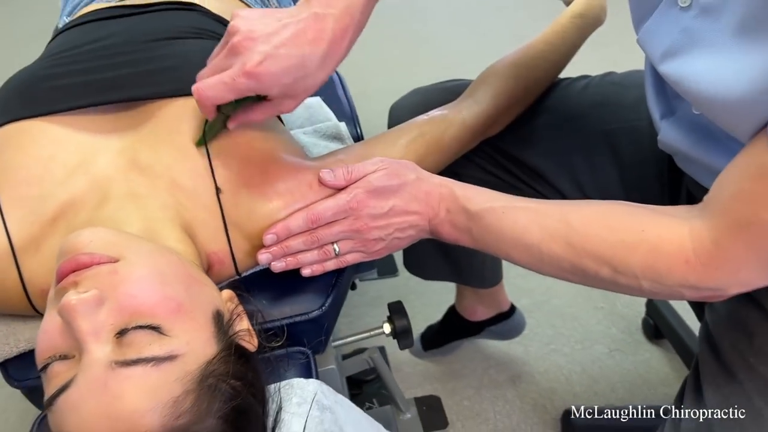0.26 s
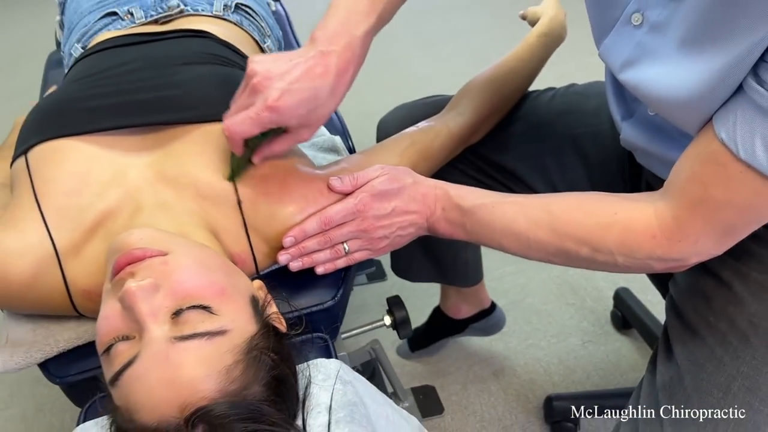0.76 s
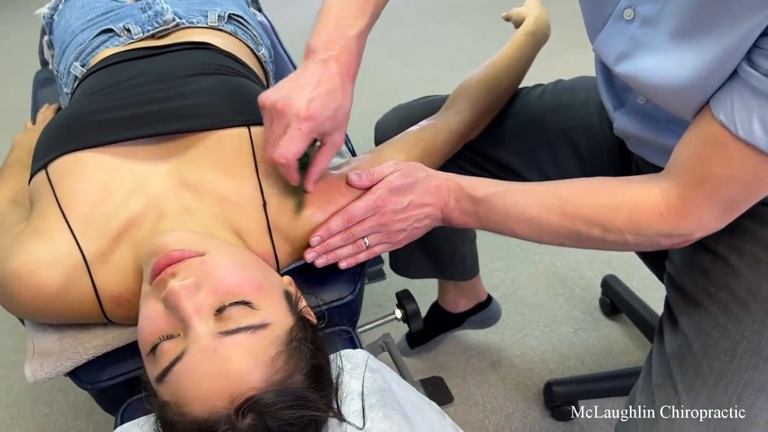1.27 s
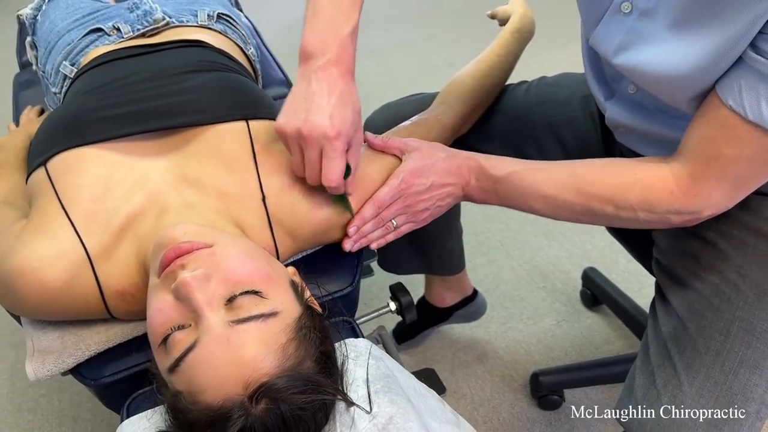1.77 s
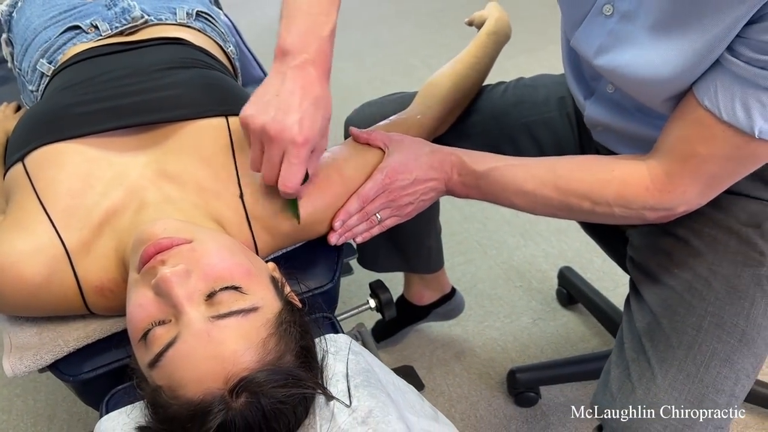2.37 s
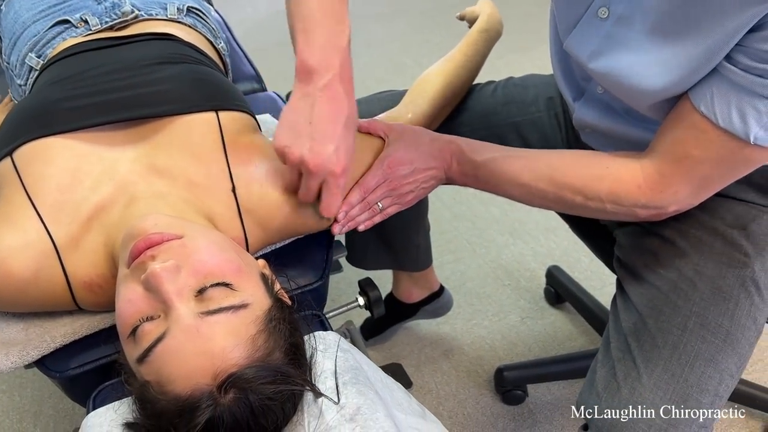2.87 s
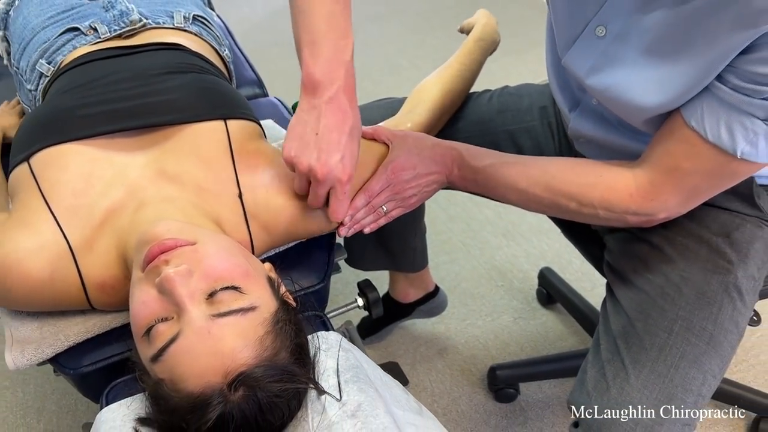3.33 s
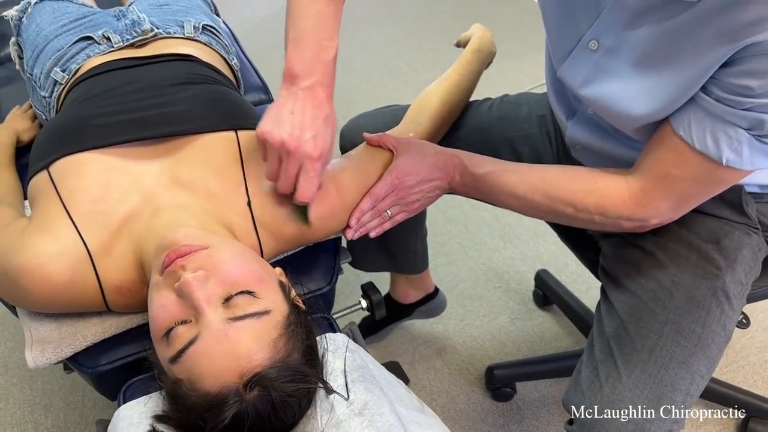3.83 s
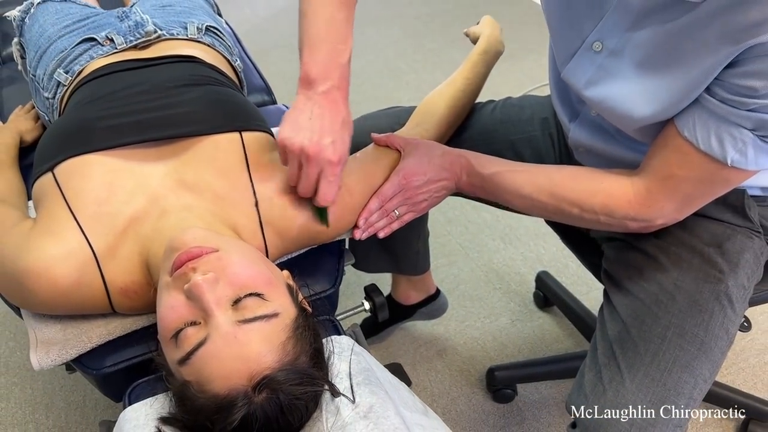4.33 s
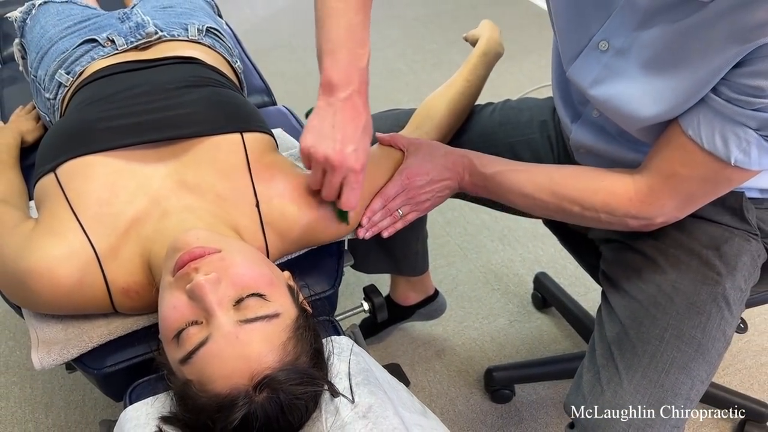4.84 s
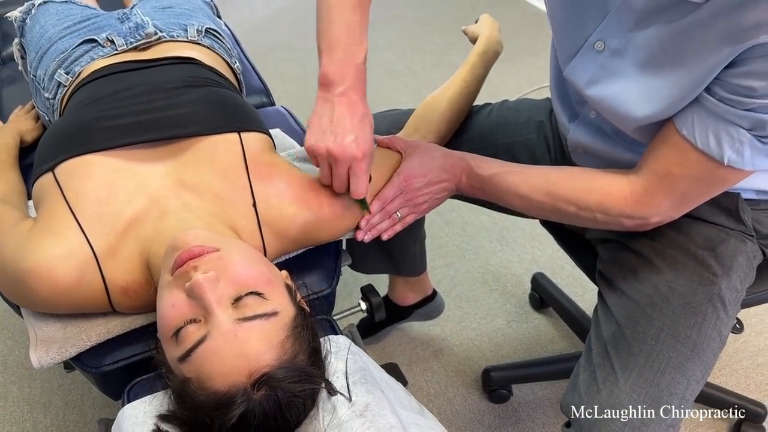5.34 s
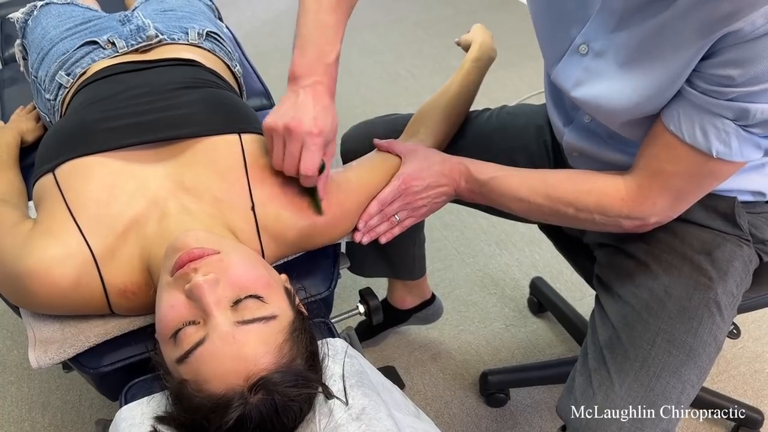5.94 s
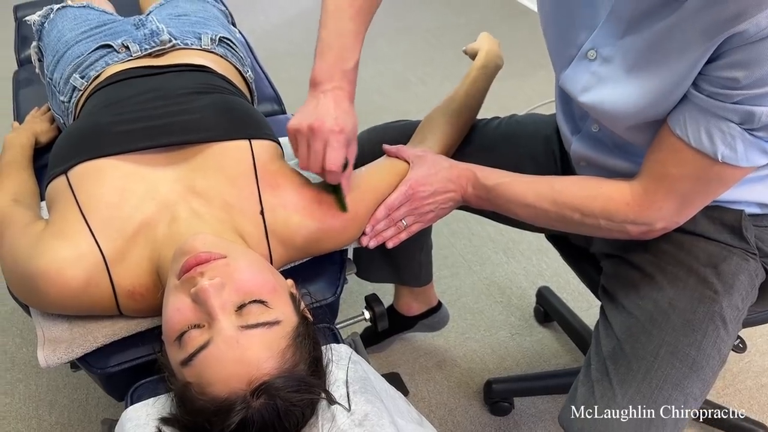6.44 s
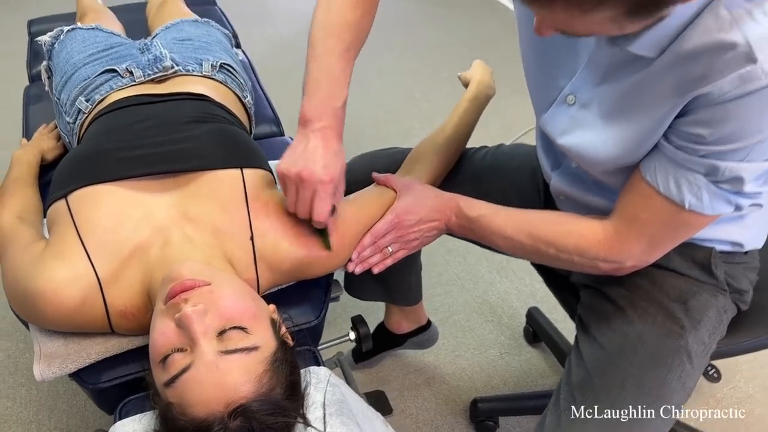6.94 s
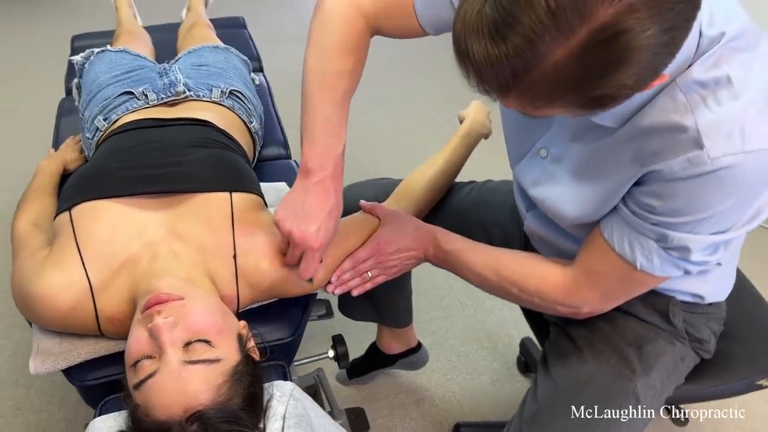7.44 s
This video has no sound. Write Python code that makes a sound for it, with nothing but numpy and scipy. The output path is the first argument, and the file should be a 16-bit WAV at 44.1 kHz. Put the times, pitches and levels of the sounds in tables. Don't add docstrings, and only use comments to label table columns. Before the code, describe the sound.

In a small treatment room with low ventilation rumble, one sharp loud snap comes early, then faint skin strokes, small ticks and a paper crumple.

```python
import sys
import numpy as np
from scipy import signal
from scipy.fft import rfft, irfft
from scipy.io import wavfile

SR = 44100
rng = np.random.default_rng(int(sys.argv[2]) if len(sys.argv) > 2 else 0)


def rack_gain(trim_db):
    fader = np.asarray(trim_db, float)
    return 10 ** (fader / 20)


def output_pcm(signal):
    pcm = np.clip(np.atleast_2d(signal).T, -1, 1) * 32767
    wavfile.write(sys.argv[1], SR, np.round(pcm).astype(np.int16))


N = 339570

# (start [s], tool on skin [dB], cloth and paper [dB])
STROKES = [(1.837, -66, -67), (2.057, -70, -71), (2.264, -70, -65), (3.023, -71, -65), (3.788, -71, -62.5),
           (4.19, -70, -66.5), (4.6, -70, -64), (5.04, -61, -64.5), (5.468, -68, -65), (5.91, -76, -70),
           (6.067, -65, -76), (6.293, -65, -69), (7.59, -68, -63.5)]
STROKE_RISE_S, STROKE_HOLD_S, STROKE_FALL_S = 0.021, 0.052, 0.026
# (start [s], length [s], skin [dB], cloth and paper [dB])
JERKS = [
    (0, 0.015, -48, -54),
    (0.212, 0.14, -61, -54),
    (0.41, 0.23, -60.5, -54.5),
    (0.456, 0.075, -57, -57),
    (.585, 0.23, -65, -61.5),
    (0.839, 0.22, -58.5, -56),
    (2.906, 0.082, -56.5, -70),
    (6.577, 0.04, -57, -55.5),
    (7.293, 0.038, -57, -60),
    (7.495, 0.041, -56.5, -61),
]
JERK_RISE_SHARE, JERK_HOLD_SHARE = 0.1, 0.081
# (start [s], hold [s], skin [dB], cloth and paper [dB])
SHIFTS = [
    (1.08, .75, -67, -73.5),
    (2.605, .26, -79, -69),
    (5.27, .23, -70, -71),
    (6.507, 0.04, -61, -60.5),
    (6.608, .18, -67, -61.5),
    (7.175, 0.053, -65, -56.5),
    (7.243, 0.033, -72, -55.5),
    (7.358, 0.092, -64, -58),
]
SHIFT_RISE_S, SHIFT_FALL_S = 0.046, 0.094
SKIN_FLUTTER_DB, CLOTH_FLUTTER_DB = 3, 1.8
# (frequency [Hz], density [dB per Hz])
SKIN = [(600, 4), (1000, 6), (1600, 8.5), (2500, 3.5), (4000, -11), (8000, -29)]
# (frequency [Hz], density [dB per Hz])
CLOTH = [(1500, -11), (2500, -2), (4500, 2), (7000, -3.5), (10500, -0.5), (13000, -10), (16000, -15)]

# (time [s], peak [dB])
SNAP = [
    (.32855, -6),
]
# (frequency [Hz], level [dB], t60 [s])
SNAP_MODES = [(800, -19.5, 0.018), (2040, -7, 0.0028), (3670, -2, 0.0022), (4960, -2.5, 0.0032),
              (7600, -1.5, 0.0006), (11100, -5.5, 0.0013)]
SNAP_TOP_HZ = 13500
# (from [s], to [s], low edge [Hz], high edge [Hz])
TREBLE_GAP = (.313, .3235, 2700, 12500)

# (time [s], peak [dB], ring [Hz], top end [dB], room [dB])
TICKS = [(0.1264, -51, 1530, 4, 4), (0.481, -46, 1870, 10, 0), (0.5916, -41, 1660, 4.5, -4.5),
         (0.7347, -53, 1410, -2, -2), (0.8948, -28.5, 1740, -7, -11.5), (0.935, -49.5, 2920, 7, -4),
         (1.3917, -46, 1440, -5, -16), (1.413, -37.5, 1530, -13, -14), (1.642, -40.5, 1480, -6, -13),
         (2.9102, -42, 1680, -6, -16), (5.2719, -38, 8500, -6, -11), (5.3545, -45.5, 1460, -4, -6),
         (6.6387, -51, 1630, 5, -12), (6.6738, -50, 1600, 4, -16), (6.791, -49.5, 1510, 8.5, -12),
         (7.461, -43, 13000, -14, -16)]
SHORTEST_RING_S = .0035
BOUNCE_S, BOUNCE_DB = 0.0052, -10

# (time [s], level [dB rms], hold [s], t60 [s])
CRUMPLE = [
    (3.457, -42, .022, .19),
]
# (frequency [Hz], density [dB per Hz])
PAPER = [(350, -22), (500, 1), (670, -11), (1050, 0.5), (1500, -12), (2260, -5.5), (3540, -12.5),
         (8000, -13), (12000, -21), (16000, -31.5)]

# (time [s], pitch [Hz], level [dB rms])
SQUEAK = [
    (2.62, 3020, -82),
    (2.64, 3040, -71),
    (2.7, 3050, -68),
    (2.75, 3075, -69),
    (2.79, 3040, -69),
    (2.82, 2950, -72),
    (2.86, 2930, -71),
    (2.875, 2930, -84),
]

# (frequency [Hz], t60 [s])
ROOM_DECAY = [(500, 0.43), (1500, 0.33), (4000, 0.33), (8000, 0.23), (14000, 0.21)]
# (frequency [Hz], width [Hz], left [dB per
# Hz], right [dB per Hz], right lead [rad])
ROOM_MODES = [(8, 4.7, -60, -53, -0.5), (28, 7.1, -53, -61.5, 1.5), (39.8, 4, -50, -62, 5),
              (55, 25, -59.5, -58.5, 0.5), (69.9, 2.4, -45.5, -53, -2.6), (87.2, 12.5, -59, -55.5, 0.37),
              (98.3, 16, -58.5, -57, 0.1), (112.35, 6.6, -47, -53.5, 1.5), (127.3, 5.1, -55, -53.5, 1.34),
              (142.7, 13, -69, -56, 1), (164, 22, -77, -67, 0.2), (179.4, 6.4, -64, -72.5, 0.2),
              (195.7, 10, -73, -59, -1.66),
              (224.4, 36, -69.5, -66, -1.06), (243, 18, -60.5, -70, 2.5), (265.8, 16, -66, -64, 0.04),
              (280.6, 18.9, -67.5, -61.5, 1.07), (301.3, 15.6, -67, -68, 0.03),
              (341.8, 39, -69, -65.5, 1.15), (368.7, 18.5, -80, -68.5, 0.9), (401, 6.1, -81.5, -71, -0.1),
              (415, 13.3, -72.5, -74, -0.5), (434.3, 4.3, -85, -75, -0.5), (473.4, 9.9, -77.5, -77, 0.4),
              (598.4, 36, -79.5, -77.5, 1.14), (756, 24, -82, -85, -0.6), (860, 38, -86, -84.5, 0.8)]
# (frequency [Hz], left [dB rms], right [dB rms], right lead [rad])
HUM = [(13.64, -49.4, -49.4, -.3), (19.8, -58, -50.5, .2), (27.27, -52.8, -42.7, .9),
       (29.1, -49, -46.5, 1.2), (58.96, -44.4, -49, 1.1), (117.53, -37.6, -44.2, -2.04),
       (120, -44.7, -54.2, -1.36), (176.23, -62.4, -62.5, -.95), (234.94, -54.8, -61.2, .52),
       (240, -56.3, -61.5, 1.05)]
# (frequency [Hz], density [dB per Hz])
AIR = [(210, -50), (350, -10), (431, -7), (540, -9), (613, -14.5), (680, -14.5), (870, -15), (1060, -20),
       (1500, -23.5), (2630, -27.5), (6000, -29.5), (12000, -30), (14500, -31), (16000, -32.5)]
AIR_DB, HISS_TOP_HZ = -53, 15800
# (frequency [Hz], left-right correlation [-1 to 1])
LIKENESS = [(60, 0.36), (130, -0.1), (290, 0.076), (640, 0.29), (1410, 0.29), (3100, 0.071), (6820, -0.024),
            (15000, -0.078)]
# (frequency [Hz], left minus right [dB])
LEANING = [(60, 3), (130, 19), (290, 0.5), (640, -2), (1410, 2.5), (3100, 1.0), (6820, 0.5), (15000, 0.5)]


def unit_rms(x):
    return x / np.sqrt(np.mean(x ** 2) + 1e-20)


def in_time(rows):
    s, *columns = np.transpose(rows)
    return [np.interp(np.arange(N) / SR, s, column) for column in columns]


def at_hz(points, hz):
    table_hz, values = np.array(points).T
    return np.interp(np.log(hz), np.log(table_hz), values)


def drift(rate_hz):
    r = np.exp(-80 * np.pi * rate_hz / SR)
    noise = rng.standard_normal(N // 40 + 2002)
    slow = signal.lfilter([1], [1, -2 * r, r * r], noise)[2000:]
    return np.interp(np.arange(N) / 40, np.arange(len(slow)), unit_rms(slow))


def ring(clicks, hz, t60):
    r, w = rack_gain(-60 / (t60 * SR)), 2 * np.pi * hz / SR
    return signal.lfilter([0, np.sin(w)], [1, -2 * r * np.cos(w), r * r], clicks + 1e-18)


def coloured(x, spectrum):
    hz = np.maximum(np.fft.rfftfreq(N, 1 / SR), 1)
    return unit_rms(irfft(rfft(x) * rack_gain(at_hz(spectrum, hz)), N))


def rustle(level_db, spectrum, per_s, spread_db, wide):
    heights = rack_gain(spread_db * np.minimum(rng.exponential(1, N), 4))
    signs = rng.choice([-1, 1], N)
    grains = heights * signs * (rng.random(N) < per_s / SR)
    side = wide * coloured(rng.standard_normal(N), spectrum)
    return rack_gain(level_db) * (coloured(grains, spectrum) + side * [[1], [-1]])


def tail(hits_db, tilt):
    out, edges = 0, 500 * 2 ** np.arange(0, 5.1, .5)
    clicks = np.zeros(N)
    places = [round(s * SR) + 90 for s, db in hits_db]
    clicks[places] = rack_gain([db for s, db in hits_db])
    white = rng.standard_normal((2, 2, N))
    for k, (low, high) in enumerate(zip(edges, edges[1:])):
        hz = np.sqrt(low * high)
        decay = rack_gain(-60 / (at_hz(ROOM_DECAY, hz) * SR))
        fade = signal.lfilter([1], [1, -decay], clicks + 1e-18)
        band = signal.butter(2, [low, high], "band", fs=SR, output="sos")
        mid, side = signal.sosfilt(band, white[k % 2])
        out = out + rack_gain(at_hz(tilt, hz)) * fade * (mid + 0.64 * side * [[1], [-1]])
    return out


def rubbing():
    moves = [(s, STROKE_RISE_S, STROKE_HOLD_S, STROKE_FALL_S, *db) for s, *db in STROKES]
    moves += [(s, SHIFT_RISE_S, hold, SHIFT_FALL_S, *db) for s, hold, *db in SHIFTS]
    fade_share = 1 - JERK_RISE_SHARE - JERK_HOLD_SHARE
    for s, length, *db in JERKS:
        moves.append((s, JERK_RISE_SHARE * length, JERK_HOLD_SHARE * length, fade_share * length, *db))
    t, power = np.arange(N) / SR, np.full((2, N), 1e-20)
    for s, rise, hold, fall, skin_db, cloth_db in moves:
        swell = np.interp(t, np.cumsum([s, rise, hold, fall]), [0.0087, 0.92, 0.86, 0.0085])
        power += (swell * rack_gain([[skin_db], [cloth_db]])) ** 2
    skin_db, cloth_db = 10 * np.log10(power)
    skin_db = skin_db + SKIN_FLUTTER_DB * drift(18)
    skin = rustle(skin_db, SKIN, per_s=6000, spread_db=4, wide=0.53)
    cloth_db = cloth_db + CLOTH_FLUTTER_DB * drift(20)
    cloth = rustle(cloth_db, CLOTH, per_s=12000, spread_db=3.5, wide=.5)
    return skin + cloth


def snap():
    (s, peak_db), clicks = SNAP[0], np.zeros(N)
    echoes = [(0, 0), (.0005, -12), (.0018, -15), (.009, -24), (.0125, -21), (.0165, -24), (.021, -24)]
    for late_s, echo_db in echoes:
        clicks[round((s + late_s) * SR)] = -rack_gain(peak_db + echo_db)
    body = 0
    for k, (hz, db, t60) in enumerate(SNAP_MODES):
        body = body + (-1) ** k * rack_gain(db) * ring(clicks, hz, t60)
    body = signal.sosfilt(signal.butter(3, SNAP_TOP_HZ, fs=SR, output="sos"), body)
    tilt = [(700, 3.5), (1500, -3), (3500, 2.5), (6000, -2.5), (9000, -2.5), (14000, -25)]
    return body, tail([(s, peak_db - 25.5)], tilt)


def ticks():
    out, click = np.zeros(N), np.eye(1, 900, 40)[0]
    edge = ring(click, 2500, 0.0037) - ring(click, 5100, 0.0026)
    edge = edge + ring(click, 8800, 0.0028) - ring(click, 11400, 0.001)
    for s, peak_db, hz, top_db, room_db in TICKS:
        body = ring(click, hz, max(10.0 / hz, SHORTEST_RING_S))
        body = body - 0.4 * ring(click, 0.6 * hz, 12.0 / hz) + rack_gain(top_db) * edge
        bounce = ring(click, 1.04 * hz, 8.0 / hz)
        out[round(s * SR):][:900] += rack_gain(peak_db) * body
        out[round((s + BOUNCE_S) * SR):][:900] += rack_gain(peak_db + BOUNCE_DB) * bounce
    hits_db = [(s, peak_db + room_db) for s, peak_db, hz, top_db, room_db in TICKS]
    return out + tail(hits_db, [(700, -1.0), (1600, -5.0), (4000, -6), (12000, -18)])


def crumple():
    s, level_db, hold_s, t60 = CRUMPLE[0]
    late = np.arange(N) / SR - s
    tear_db = 6 * np.exp(-np.maximum(late, 0) / 0.005)
    decay_db = 60 * np.maximum(late - hold_s, 0) / t60
    fade_db = np.where(late < 0, -200, level_db + tear_db - decay_db)
    crackle = rustle(fade_db, PAPER, per_s=7000, spread_db=3.0, wide=.5)
    return crackle + tail([(s + 0.018, level_db + 1)], [(700, 1), (2000, 5.5), (5000, -1.5), (12000, -12)])


def squeak():
    before, after = (2.58, SQUEAK[0][1], -110), (2.9, SQUEAK[-1][1], -110)
    hz, level_db = in_time([before] + list(SQUEAK) + [after])
    whistle = np.sin(2 * np.pi * np.cumsum(hz) / SR)
    return np.sqrt(2) * rack_gain(level_db + 1.9 * drift(25)) * whistle


def rumble():
    hz = np.fft.rfftfreq(N, 1 / SR)[1:N // 20]
    out = np.zeros((2, N // 2 + 1), complex)
    for centre_hz, width_hz, left_db, right_db, lead in ROOM_MODES:
        noise = rng.standard_normal(len(hz)) + 1j * rng.standard_normal(len(hz))
        shape = 1 / (1 + (2 * (hz - centre_hz) / width_hz) ** 2)
        pair = [[rack_gain(left_db)], [rack_gain(right_db) * np.exp(1j * lead)]]
        out[:, 1:N // 20] += noise * shape * pair
    return irfft(out * np.sqrt(SR * N) / 2, N)


def hum():
    t, out = np.arange(N) / SR, 0
    for hz, left_db, right_db, lead in HUM:
        phase = 2 * np.pi * (hz * t + rng.random())
        waver = rack_gain(.4 * drift(.6))
        out = out + np.sqrt(2) * waver * np.sin([phase, phase + lead]) * rack_gain([[left_db], [right_db]])
    return out


def air():
    hz = np.maximum(np.fft.rfftfreq(N, 1 / SR), 1)
    mid, side = rfft(rng.standard_normal((2, N))) * rack_gain(at_hz(AIR, hz))
    alike = np.clip(at_hz(LIKENESS, hz), -1, 1)
    lean_db = at_hz(LEANING, hz) / 2
    pair = np.sqrt(1 + alike) * mid + np.sqrt(1 - alike) * side * [[1], [-1]]
    return rack_gain(AIR_DB) * unit_rms(irfft(pair * rack_gain([lean_db, -lean_db]), N))


def scene():
    crack, answer = snap()
    soft = answer + rubbing() + ticks() + crumple() + squeak() + rumble() + hum() + air()
    below_top = np.fft.rfftfreq(N, 1 / SR) < HISS_TOP_HZ
    return irfft(rfft(soft) * below_top, N) + crack


def roll_off(x):
    return signal.sosfilt(signal.butter(12, 16520, fs=SR, output="sos"), x)


def record(dry):
    start, end, *band_hz = TREBLE_GAP
    band = signal.butter(3, band_hz, "band", fs=SR, output="sos")
    treble = signal.sosfiltfilt(band, dry)
    muted = np.interp(np.arange(N) / SR, [start - .002, start, end - .001, end], [0, 1, 1, 0])
    return roll_off(dry - muted * treble)


dry = scene()
out = record(dry)
output_pcm(out)
```